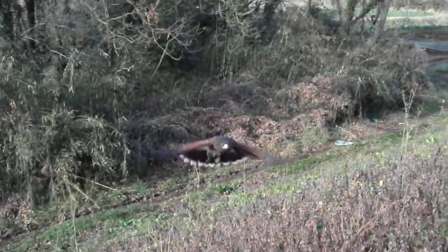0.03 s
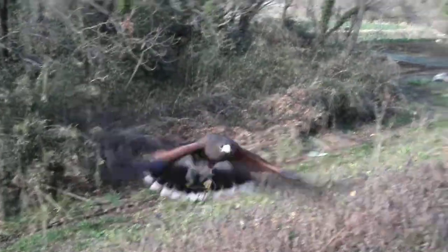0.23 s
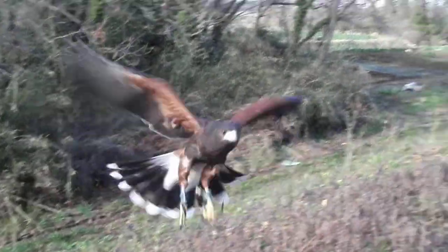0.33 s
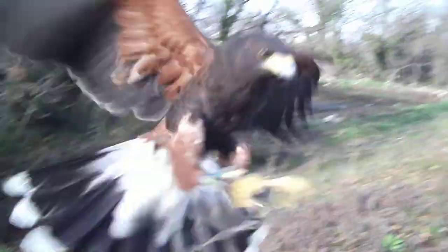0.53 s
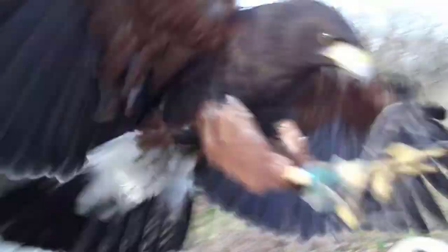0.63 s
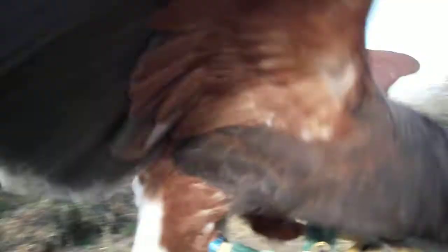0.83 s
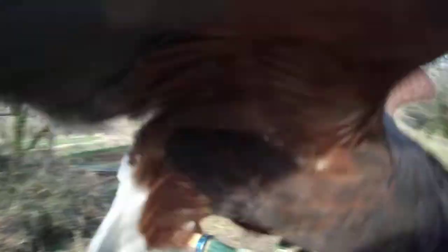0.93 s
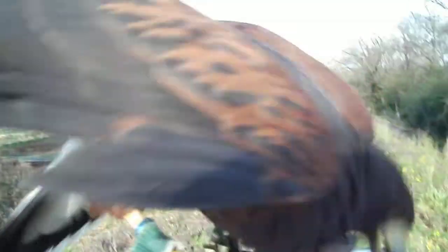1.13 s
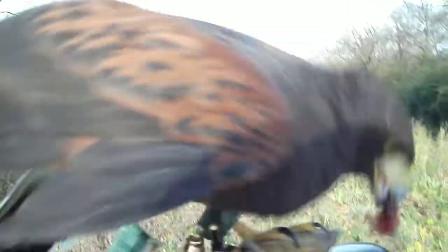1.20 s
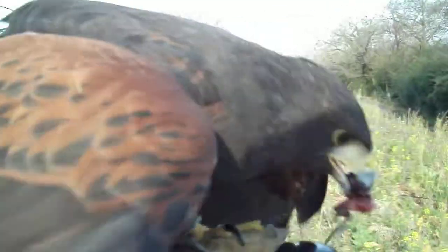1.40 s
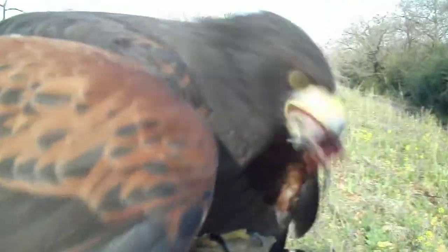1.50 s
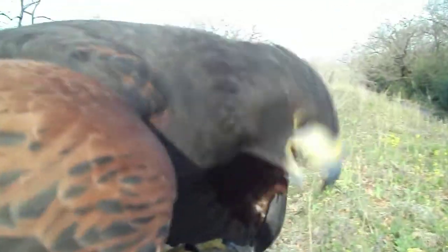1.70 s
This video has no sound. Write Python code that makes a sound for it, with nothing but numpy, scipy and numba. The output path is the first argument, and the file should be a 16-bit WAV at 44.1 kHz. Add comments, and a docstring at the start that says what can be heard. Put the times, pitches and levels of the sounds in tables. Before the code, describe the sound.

A hawk's leg bells jingle as it lands close, with fluttering rasp and beak clicks.

```python
"""An open field, where a hawk flies in low and lands on a glove right beside the microphone.
Its leg bells jingle with the wingbeats as a pellet excites the modes of their shells, and their Doppler
shift falls as it brakes. Feathers brush and the wings fan the microphone. A hoarse, fluttering rasp,
a pulse train through a resonance, goes with the landing; then beak and talons click."""
import sys
import numpy as np
from scipy import signal
from scipy.fft import rfft, irfft
from scipy.io import wavfile
from numba import njit

SR = 44100
rng = np.random.default_rng(int(sys.argv[2]) if len(sys.argv) > 2 else 0)


def persist_wave(psi):
    """Save psi, clipped to +-1, as 16-bit WAV."""
    counts = np.round(np.clip(psi, -1, 1) * 32767).astype(np.int16)
    wavfile.write(sys.argv[1], SR, np.atleast_2d(counts).T)


N = 77175


def undb(db):
    """Decibels to amplitude ratio."""
    return 10 ** (np.asarray(db) / 20)


def curve(table):
    """Linear interpolation of each column of a timed table, one value a sample."""
    times, *columns = np.array(table).T
    return [np.interp(np.arange(N) / SR, times, c) for c in columns]


def unit(x):
    """Normalisation to rms 1."""
    return x / np.std(x)


def colour(x, spectrum):
    """Spectral shaping that conserves the power of white noise."""
    hz, db = np.array(spectrum).T
    gain = undb(np.interp(np.log(np.fft.rfftfreq(N, 1 / SR) + 1), np.log(hz), db))
    return irfft(rfft(x) * gain / np.sqrt(np.mean(gain ** 2)), N)


def noise(shape=N):
    """Gaussian white noise."""
    return rng.standard_normal(shape)


def fade(t, t60):
    """Exponential decay, 60 dB in t60 seconds."""
    return np.exp(-np.log(1000) * t / t60)


def add(out, at, x):
    """Superposition of a sound from a given time on."""
    i = int(np.clip(at * SR, 0, N - 1))
    out[i:i + len(x)] += x[:N - i]


def swells(table):
    """A sum of Gaussian envelopes."""
    t = np.arange(N) / SR
    return sum(undb(db) * np.exp(-.5 * ((t - at) / sigma) ** 2) for at, sigma, db in table)


@njit
def resonate(x, hz, width):
    """Time-varying two-pole resonator whose noise power is independent of its bandwidth."""
    y, band_state, low_state = np.empty(len(x)), 0., 0.
    for i in range(len(x)):
        g, damping = np.tan(np.pi * hz[i] / SR), width[i] / hz[i]
        band = (band_state + g * (x[i] - low_state)) / (1 + g * (g + damping))
        band_state, low_state = 2 * band - band_state, low_state + 2 * g * band
        y[i] = damping * band * np.sqrt(SR / np.pi / width[i])
    return y


# Spectrum of the open air (frequency [Hz], relative level [dB])
AIR_SPECTRUM = [(12, -54), (20, 2), (65, -6), (177, -14.5), (574, -22), (923, -27), (2300, -38),
                (4700, -32), (16000, -40.5)]

def open_air():
    """Ambient noise: a faint, steady rumble with its power at low frequencies."""
    return colour(noise(), AIR_SPECTRUM) * undb(-44.5)


# Impacts of shell on fitting (time [s], level [dB])
CLACK_IMPACTS = [(0.0324, -35.5), (.233, -33), (0.4343, -20), (0.4717, -27), (0.6951, -23), (0.715, -14.5),
                 (.7908, -10), (.8155, -23), (0.872, -24), (0.8934, -19.5), (1.1154, -35), (1.178, -34)]
# Their spectrum (frequency [Hz], relative level [dB])
CLACK_SPECTRUM = [(800, -9), (2400, -13.5), (3300, 2.5), (6300, -1), (8000, -8), (14000, -1), (16000, -22)]

def shell_clacks():
    """Impact noise: the bell shells hit their fittings in dense, heavily damped bursts."""
    t = np.arange(SR // 20) / SR
    bursts = np.zeros(N)
    for at, db in CLACK_IMPACTS:
        add(bursts, at, undb(db) * noise(len(t)) * fade(t, t60=0.0093))
    return colour(bursts, CLACK_SPECTRUM)


# Flight towards the microphone (time [s], speed [m/s])
APPROACH_SPEED = [(0, 5), (.25, 4), (.45, 2.5), (.65, 3), (.79, 2.2), (1.0, -0.5)]
# Damping by the feathers as the hawk settles (time [s], factor on t60 [1])
FEATHER_DAMPING = [(1.06, 1), (1.16, 0.74), (1.3, 0.26)]
TWIN_DB, TWIN_SPREAD_HZ, DETUNE_SPREAD = -6.5, 38.7, 0.00189
ROLL_DEPTH, BUZZ_DEPTH, BUZZ_S, CONTACT_S = 0.071, .33, .008, 0.00028

def ring_modes(at, modes, edges_hz, band_db):
    """Free vibration: damped, Doppler-shifted modes, each beating with its twin in the second bell."""
    t = np.arange(SR // 4) / SR
    doppler = 1 + np.interp(at, *np.array(APPROACH_SPEED).T) / 343
    t60_factor = np.interp(at, *np.array(FEATHER_DAMPING).T)
    # The pellet buzzes on the shell, then rolls: the ring is harsh at first, then clear.
    depth = (ROLL_DEPTH + BUZZ_DEPTH * np.exp(-t / BUZZ_S)) / t60_factor
    lowpass = signal.butter(1, 240, fs=SR, output="sos")
    ring = 0
    for hz, db, t60 in modes:
        detune, twin_offset, scatter = noise(3)
        real, imag = signal.sosfilt(lowpass, signal.sosfilt(lowpass, noise((2, len(t)))))
        shudder = (1 + depth * (unit(real) + 1j * unit(imag))) / np.sqrt(1 + 2 * depth ** 2)
        beating = 1 + undb(TWIN_DB) * 1j * np.exp(2j * np.pi * TWIN_SPREAD_HZ * twin_offset * t)
        carrier = np.exp(2j * np.pi * hz * doppler * (1 + DETUNE_SPREAD * detune) * t)
        scatter_db = scatter * (3.5 if hz > 13000 else 1)  # the strike point matters most to top modes
        gain = undb(db + band_db[np.searchsorted(edges_hz, hz)] + scatter_db)
        ring = ring + gain * np.imag(shudder * beating * carrier) * fade(t, t60 * t60_factor)
    return ring * -np.expm1(-t / CONTACT_S)


# Bright modes of a bell at rest (frequency [Hz], relative level [dB], free t60 [s])
BELL_MODES = [(4912, -5.5, 0.26), (6079, -0.5, 0.11), (8939, -4, 0.22), (10318, -1.5, 0.16),
              (12220, 1, 0.099), (13700, -13, 0.13), (14330, -13, 0.12), (15090, -19.5, 0.084)]
# Boundaries of six bands of modes (frequency [Hz])
BELL_EDGES_HZ = [5500, 7500, 9600, 11500, 13000]
# Pellet blows (time [s], then six band excitations from high to low [dB])
PELLET_BLOWS = [(0.0325, -28.5, -26.5, -52, -54.5, -46.5, -51), (0.1366, -36, -44.5, -48.5, -49, -37, -51),
                (0.193, -32, -40, -53, -39, -37.5, -52), (0.2203, -21, -34, -48, -42, -40.5, -53),
                (0.235, -27, -23.5, -35, -45, -49, -58), (0.2414, -27, -19.5, -27, -39, -34, -63),
                (0.2639, -21, -18.5, -31, -35.5, -28, -38), (0.2861, -25, -41, -32, -42, -24, -36),
                (0.3272, -17, -51, -28.5, -34, -23.5, -44), (0.3683, -33, -41, -35, -34, -33.5, -35),
                (0.4337, -13, -27, -20, -31, -21.5, -27), (0.4399, -13, -24, -18, -43, -21, -38),
                (0.4454, -8.5, -14.5, -19, -30, -32, -17.5), (0.4614, -22, -28, -26, -26, -7, -22),
                (0.4714, -23, -32, -39, -32, -12, -45), (0.505, -18, -37, -20, -24, -24, -34),
                (0.5174, -27, -33, -37, -46, -21, -48), (0.561, -25, -32, -34, -28, -20.5, -41),
                (0.634, -8, -20.5, -13.5, -10, -11.5, -13.5), (0.6444, -7.5, -26, -31, -48, -18, -49),
                (0.6743, -17, -47, -43, -40, -29, -14), (0.6854, -21, -47, -44, -30, -19.5, -45),
                (0.7314, -28, -35, -34, -33, -22, -30), (0.7878, -6.5, -27, -24, -16, -23, -17.5),
                (0.7933, -24, -17.5, -29, -23, -29, -16), (0.825, -17, -28.5, -35, -21.5, -14.5, -17),
                (0.8929, -18, -13.5, -40, -21, -44, -25.5), (0.921, -10.5, -36, -47, -20, -27, -40),
                (0.9344, -21, -50, -24.5, -22, -22.5, -20.5), (0.9985, -22, -33, -32, -36, -18.5, -41),
                (1.0025, -27, -46, -39, -27, -27.5, -29), (1.061, -25.5, -49, -31, -31, -29.5, -32.5),
                (1.1153, -42, -63, -63, -69, -33, -59), (1.1643, -32, -46, -41, -56, -29.5, -42),
                (1.2024, -46, -50, -49, -63, -38, -46), (1.3024, -50, -58, -41.5, -45.5, -36.5, -46),
                (1.3154, -46, -54, -41, -47, -28, -48)]
# Spectrum of the pellet's contact (frequency [Hz], relative level [dB])
TICK_SPECTRUM = [(700, -56), (2200, -24), (3300, 6), (5500, -1), (7500, 0.5), (11000, -3.5), (14000, -29),
                 (16000, -38)]
RING_DB, CHOKE_DB, CHOKE_S = 2.5, -11.5, 0.01

def leg_bells():
    """Impulsive excitation: each pellet blow ticks and rings the shells until the next damps them."""
    t = np.arange(SR // 4) / SR
    rings, ticks = np.zeros(N), np.zeros(N)
    next_times = [row[0] for row in PELLET_BLOWS[1:]] + [N / SR]
    for (at, *band_db), next_at in zip(PELLET_BLOWS, next_times):
        choke_db = CHOKE_DB * np.clip((at + t - next_at) / CHOKE_S, 0, 1)
        ring = ring_modes(at, BELL_MODES, BELL_EDGES_HZ, band_db[::-1])
        add(rings, at, undb(RING_DB + choke_db) * ring)
        tick = undb(-10.5) * fade(t, t60=0.0078)
        skitter = undb(-35.5) * fade(t, t60=0.27) * noise(len(t))
        strength = np.linalg.norm(undb(band_db[:-1]))
        add(ticks, at, strength * noise(len(t)) * (tick + skitter))
    return rings + colour(ticks, TICK_SPECTRUM)


# Feather strokes (peak time [s], Gaussian width [s], level [dB])
FEATHER_STROKES = [(0.094, 0.035, -51), (.3, 0.039, -42.5), (1.057, 0.038, -42), (1.611, 0.019, -48)]
# Their spectrum (frequency [Hz], relative level [dB])
FEATHER_SPECTRUM = [(500, -7.5), (2000, -8.5), (4000, -1.5), (6200, 1.5), (9000, -6.5), (15000, -13)]

def feathers():
    """Friction noise: feathers slide over each other in grainy swells."""
    return swells(FEATHER_STROKES) * colour(noise() * noise(), FEATHER_SPECTRUM)


# Duller modes of bells and fittings (frequency [Hz], relative level [dB], free t60 [s])
CLINK_MODES = [(1555, -5.5, 0.25), (1686, -7.5, 0.28), (3246, 5.5, 0.025), (3735, 2.5, 0.15)]
# Boundaries of their three bands (frequency [Hz])
CLINK_BANDS_HZ = [2500, 3500]
# Excitation by knocks (time [s], low pair [dB], short ping [dB], upper mode [dB])
CLINK_KNOCKS = [(0.137, -51, -49, -52), (0.193, -70, -46, -54), (0.237, -56, -60, -42.5),
                (.287, -41.5, -46, -39.5), (0.326, -43, -34.5, -43), (0.559, -39, -43, -39.5),
                (0.68, -25.5, -46, -27), (0.733, -30, -22.5, -56), (0.7895, -24.5, -26, -30),
                (0.923, -31.5, -35, -26), (1.001, -42, -24.5, -65), (1.165, -55, -45, -54)]

def clinks():
    """Modal response: knocks excite the lower modes of the bells and their fittings."""
    rings = np.zeros(N)
    for at, *band_db in CLINK_KNOCKS:
        add(rings, at, ring_modes(at, CLINK_MODES, CLINK_BANDS_HZ, band_db))
    return rings


# Puffs of air (peak time [s], Gaussian width [s], level [dB])
WING_PUFFS = [(.3, 0.023, -41), (.76, 0.03, -35)]
# Their spectrum (frequency [Hz], relative level [dB])
DRAUGHT_SPECTRUM = [(15, -2), (60, -7.5), (140, -21), (250, -15), (600, -33), (3000, -79)]

def wing_draughts():
    """Wind noise: air pushed by the wings makes slow pressure fluctuations at the microphone."""
    return swells(WING_PUFFS) * colour(noise(), DRAUGHT_SPECTRUM)


# Envelope of the rasp (time [s], body gain [dB], hiss gain [dB])
RASP_GAINS = [(.355, -70, -68), (.378, -43.5, -45.5), (.436, -31, -29.5), (.522, -35.5, -33.5),
              (.54, -37, -42), (.601, -35.5, -35.5), (.608, -30.5, -50), (.618, -36.5, -31),
              (.634, -31, -29.5), (.68, -29.5, -27.5), (.75, -32, -34), (.783, -32.5, -34.5),
              (.795, -34, -30.5), (.85, -30, -33.5), (.89, -27.5, -31), (.935, -26.5, -31),
              (.968, -15, -35.5), (.978, -19.5, -35), (.985, -38, -35)]
# Its flutter (time [s], pulse rate [1/s], unevenness [0-1], resonance [Hz], bandwidth [Hz])
RASP_FLUTTER = [(.37, 666, 0.29, 565, 300), (.46, 620, 0.29, 705, 293), (.52, 558, 0.38, 610, 262),
                (.7, 432, 0.34, 663, 280), (.88, 340, 0.36, 695, 345), (.935, 400, .25, 814.2, 540),
                (.958, 250, .1, 1110, 770), (.978, 180, 0, 1150, 950)]
# Spectral shape of its hollow body (frequency [Hz], relative level [dB])
BODY_SPECTRUM = [(60, -35), (200, 3.5), (330, 7), (500, -2), (720, 6.5), (1000, 1.5), (1500, -7.5),
                 (1900, -38), (3000, -32)]
# Spectral shape of its hiss (frequency [Hz], relative level [dB])
HISS_SPECTRUM = [(400, -13.5), (1200, -6.5), (2000, -2), (2600, -4.5), (3300, 2), (4500, 1), (5600, 0),
                 (7500, -12), (11000, -9), (16000, -26)]
PUFF_S, BODY_NOISE, HISS_FLOOR = 0.00065, 0.69, 0.027
NARROW_AT_S, NARROW_OVER_S, NARROW_HZ, SKIRT_HZ = 0.888, 0.04, 3950, 1030

def rasp():
    """Source and filter: ragged, hissing pulses drive a resonance; they slow, even out and stop dead."""
    body_db, hiss_db = curve(RASP_GAINS)
    rate, uneven, hz, width = curve(RASP_FLUTTER)
    t = np.arange(SR // 100) / SR
    pulses, puffs, at = np.zeros(N), np.zeros(N), RASP_GAINS[0][0]
    for jitter, shimmer in noise((600, 2)):
        if at > RASP_GAINS[-1][0]:
            break
        i = int(at * SR)
        strength = undb(9 * uneven[i] * np.clip(shimmer, -2, 1.3)) / np.sqrt(rate[i])
        pulses[i] -= strength * np.sqrt(SR)
        add(puffs, at, strength * np.sqrt(2 / PUFF_S) * np.exp(-t / PUFF_S))
        at += np.exp(uneven[i] * np.clip(jitter, -2, 2)) / rate[i]
    source = pulses + BODY_NOISE * puffs * noise()
    ringing = resonate(source + 1e-18, hz, width)
    body = unit(colour(ringing, BODY_SPECTRUM)) * np.std(ringing)
    hiss = colour((puffs + HISS_FLOOR) * noise(), HISS_SPECTRUM)
    # Near the end the hiss crossfades to a narrower band.
    blend = np.clip((np.arange(N) / SR - NARROW_AT_S) / NARROW_OVER_S, 0, 1)
    peak = [(NARROW_HZ - SKIRT_HZ, -14), (NARROW_HZ, 3), (NARROW_HZ + SKIRT_HZ, -7)]
    narrow = unit(colour(hiss, peak)) * np.std(hiss)
    return body * undb(body_db) + (hiss * (1 - blend) + narrow * blend) * undb(hiss_db)


# Contacts of beak and talons (time [s], gain [dB], pitch [Hz], crack relative to ring [dB])
CLICK_CONTACTS = [(0.9826, -15, 3400, -8), (1.0029, -12.5, 3500, 2), (1.05, -10.5, 4020, -8),
                  (1.0689, -21.5, 1069, -20), (1.093, -30, 1210, -20), (1.2472, -21, 7200, -26),
                  (1.3658, -24.5, 6800, -13), (1.3843, -7, 4420, 10), (1.4077, -15, 5570, -20),
                  (1.709, -26, 7200, -15), (1.7167, -24.5, 7400, 1)]
# Modes of a click (ratio to pitch [1], relative level [dB], t60 [cycles of the pitch])
CLICK_PARTIALS = [(.68, -9.5, 21), (1, 3, 8.3), (1.85, -9, 5.4)]
# Spectrum of its tail (frequency [Hz], relative level [dB])
TAIL_SPECTRUM = [(700, -40), (1500, -14), (3000, -3.5), (5500, -3.5), (9000, -7), (15000, -32)]
RISE_CYCLES, CRACK_HZ, TAIL_DB = 0.15, 7500, -24.5

def beak_and_talons():
    """Damped transients: each contact rings briefly and leaves a dry tail; hard ones also crack."""
    t = np.arange(SR // 10) / SR
    snaps, tails = np.zeros(N), np.zeros(N)
    crack = np.sin(2 * np.pi * CRACK_HZ * t) * fade(t, 2 / CRACK_HZ)
    for at, db, hz, crack_db in CLICK_CONTACTS:
        ring = sum(undb(mode_db) * np.sin(2 * np.pi * hz * ratio * t) * fade(t, cycles / hz)
                   for ratio, mode_db, cycles in CLICK_PARTIALS)
        attack = -np.expm1(-t * hz / RISE_CYCLES)
        highpass = signal.butter(2, hz * 0.86, "high", fs=SR, output="sos")
        add(snaps, at, undb(db) * signal.sosfilt(highpass, ring * attack + undb(crack_db) * crack))
        add(tails, at, undb(db + TAIL_DB) * noise(len(t)) * fade(t, t60=0.038))
    return snaps + colour(tails, TAIL_SPECTRUM)


def scene():
    """Superposition in a free field: every source is close and dry."""
    return (open_air() + shell_clacks() + leg_bells() + feathers() + clinks()
            + wing_draughts() + rasp() + beak_and_talons())[None]


def record(dry):
    """Saturation and band limiting: the microphone clips at full scale and cuts the top treble."""
    lowpass = signal.ellip(8, .2, 70, 15750, fs=SR, output="sos")
    return signal.sosfilt(lowpass, np.clip(dry, -1, 1))


dry = scene()
out = record(dry)
persist_wave(out)
```